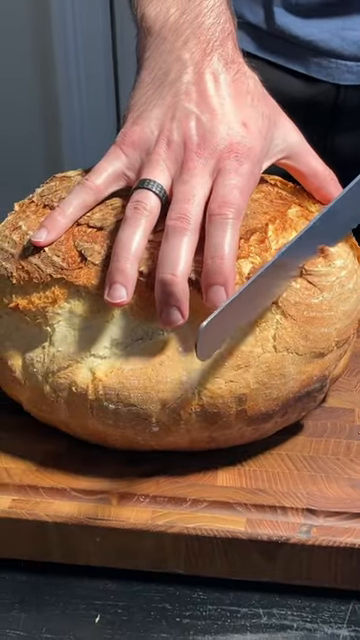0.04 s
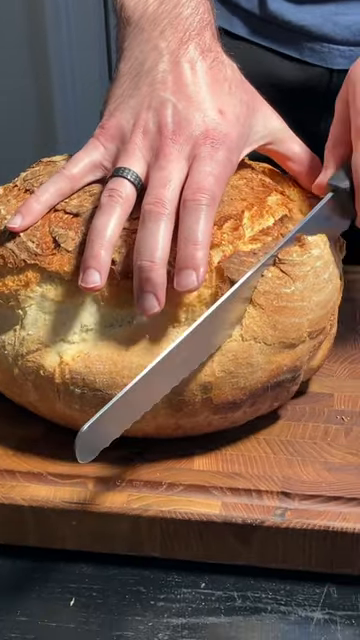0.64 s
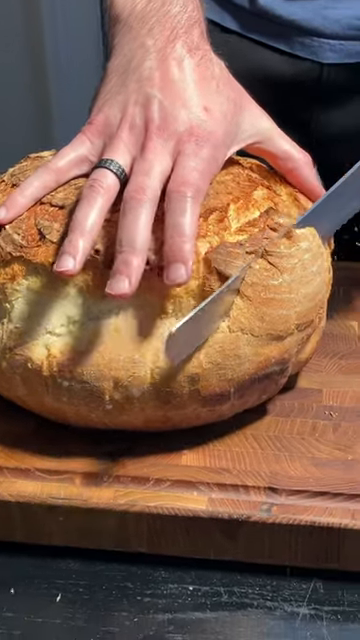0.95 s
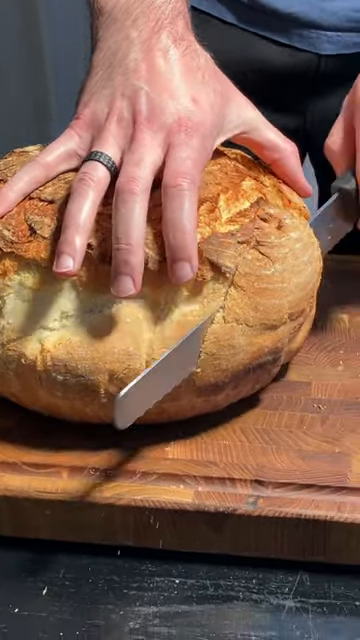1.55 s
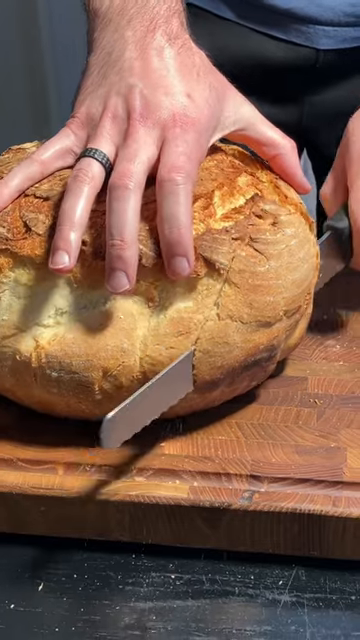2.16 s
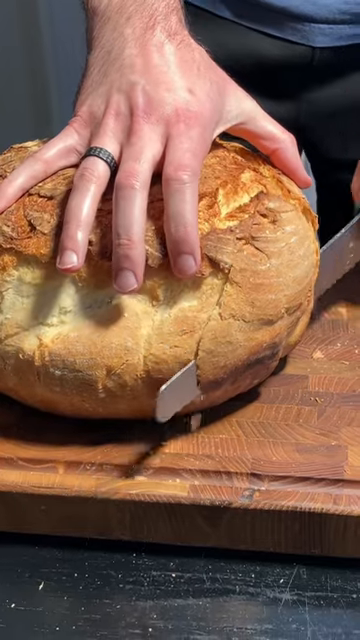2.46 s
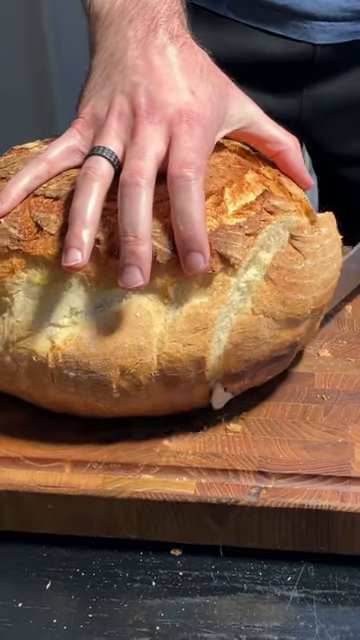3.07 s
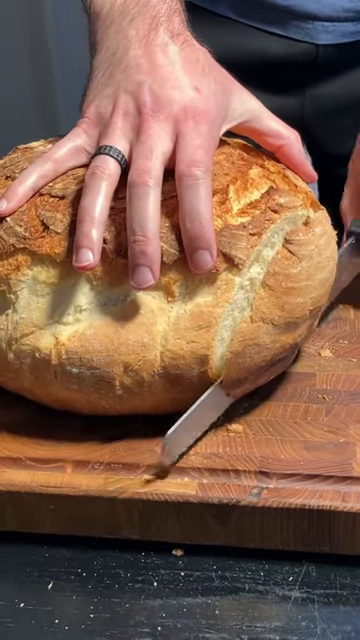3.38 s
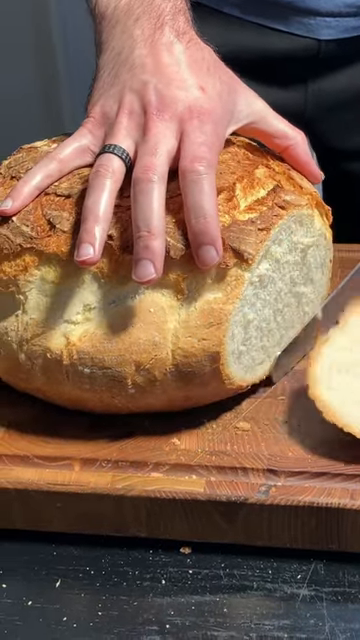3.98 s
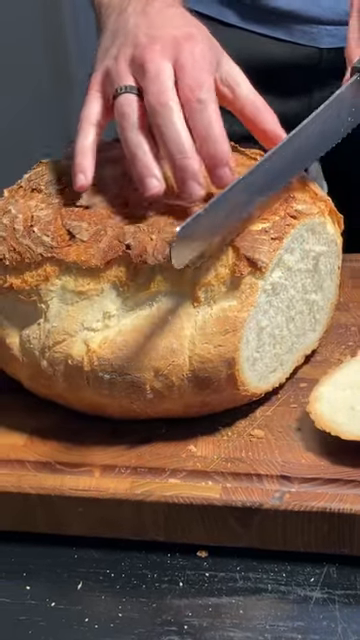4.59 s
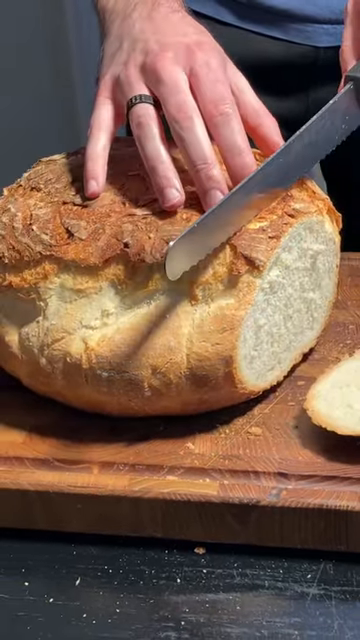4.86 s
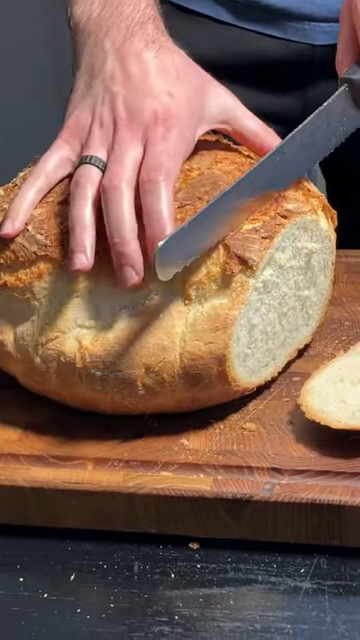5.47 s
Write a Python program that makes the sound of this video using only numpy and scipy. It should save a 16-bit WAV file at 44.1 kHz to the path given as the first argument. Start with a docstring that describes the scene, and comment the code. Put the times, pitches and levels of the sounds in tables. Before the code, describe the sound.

From the start, a serrated knife saws through a crusty loaf, close to the microphone in an echoing kitchen with a faint, steady low hum. Uneven pushes and pulls come about three or four times a second. Each brings bright crackles and snaps of crust, a dry rasp with a slight steel ring, and dull thumps through the wooden board. At about 3.8 seconds the blade breaks through with a crunch and hits the wood in a sharp clack, the loudest moment, then settles with a few small taps. From 4 seconds it is much quieter: crumbs tick, and the blade gives the loaf a soft, hollow bump near 4.3 seconds. Fingers brush the crust very faintly from 4.6 to 5 seconds, followed by a few crisp ticks. Near 5.4 seconds the blade touches the loaf and the next cut begins, crackling until about 5.7 seconds.

```python
"""Over a low, steady hum, a bread knife saws through a crusty loaf, close by in an echoing kitchen.
Stroke after stroke, its teeth crack the crust, rasp inside the loaf and shake the wooden board.
Near 3.8 s the blade breaks through and knocks on the wood. Crumbs tick and the blade bumps the loaf.
Then fingers brush the crust and take a new grip, and near 5.4 s the next cut begins."""
import sys
import numpy as np
from scipy import signal
from scipy.fft import rfft, irfft, next_fast_len
from scipy.io import wavfile
from scipy.ndimage import uniform_filter1d, map_coordinates

SR = 44100
rng = np.random.default_rng(int(sys.argv[2]) if len(sys.argv) > 2 else 0)


def int16_out(signal):
    """Quantize to a 16-bit WAV file."""
    q = np.round(np.clip(np.atleast_2d(signal).T, -1, 1) * 32767)
    wavfile.write(sys.argv[1], SR, q.astype(np.int16))


N = 252693
TIME = np.arange(N) / SR
TOP_HZ = 16000


def amp(db):
    """Turn decibels into a number to multiply by."""
    return 10 ** (np.asarray(db) / 20)

def unit(x):
    """Scale a signal to an average power of 1."""
    return x / np.sqrt(np.mean(x ** 2) + 1e-20)

def along(points, hz):
    """Read between the rows of a (frequency, value) table, on a log scale."""
    f, v = np.transpose(points)
    return np.interp(np.log(hz + 1), np.log(f + 1), v)

def tone(points):
    """Turn a (frequency, level) table into a gain curve."""
    return lambda hz: amp(along(points, hz))

def resonances(rows):
    """A gain curve with one peak for each (pitch, width, level) row."""
    return lambda f: sum(amp(db) / (1 + (2 * (f - hz) / width) ** 2) for hz, width, db in rows)

def add(track, s, sound):
    """Mix a sound into a track, starting at s seconds."""
    part = track[..., max(round(s * SR), 0):][..., :sound.shape[-1]]
    part += sound[..., :part.shape[-1]]

def filtered(x, response):
    """Multiply each frequency in x by response(frequency)."""
    m = next_fast_len(N + SR // 2)
    return irfft(rfft(x, m) * response(np.fft.rfftfreq(m, 1 / SR)), m)[..., :N]

def coloured(x, gain, size=16384):
    """Shape x with a gain curve that rings only after each hit; white noise keeps its power."""
    cepstrum = irfft(np.log(np.maximum(gain(np.fft.rfftfreq(size, 1 / SR)), 1e-6)))
    cepstrum[1:size // 2] *= 2
    cepstrum[size // 2 + 1:] = 0
    ring = irfft(np.exp(rfft(cepstrum)))
    return signal.fftconvolve(x, ring[None] / np.linalg.norm(ring), axes=1)[:, :N]

def burst(rise, t60):
    """Loudness of one hit, peaking at 1. The fade time t60 is the seconds it takes to drop 60 dB."""
    t = np.arange(SR // 8) / SR
    shape = (1 - np.exp(-t / rise)) * amp(-60 * t / t60)
    return shape / shape.max()

def splinters(rate, scatter_db):
    """Two streams of tiny, uneven cracks, about `rate` a second in each."""
    present = rng.random((2, N)) < rate / SR
    sign = rng.choice([-1, 1], (2, N))
    return unit(present * sign * amp(scatter_db * rng.standard_normal((2, N))))

# How loud the hum is: (time [s], level [dB])
HUM_LEVELS = [(0.0, -51), (0.41, -49), (1.23, -56), (2.47, -49.5), (2.52, -44), (2.71, -49.5), (3.3, -50.5),
              (3.38, -59), (3.57, -53.5), (3.62, -63.5), (4.18, -46), (4.28, -52), (5.33, -51), (5.38, -61),
              (5.46, -49.5), (5.73, -52)]
# The faint rush of room air: (frequency [Hz], level [dB])
AIR_TONE = [(25, -38), (50, -20), (75, -18.5), (100, -26.5), (190, -31.5), (320, -42), (620, -46),
            (1000, -57), (1700, -61.5), (5000, -62), (16000, -74)]
def hum_and_air(hum_hz=63.0, waver_radians=0.2, flutter_db=0.16):
    """A slightly unsteady low hum, like a fridge, in faint room air."""
    drift, flutter = [map_coordinates(knots, [TIME * 5]) for knots in rng.standard_normal((2, 64))]
    level = amp(np.interp(TIME, *np.transpose(HUM_LEVELS)) - flutter_db * flutter)
    hum = level * np.sqrt(2) * np.sin(2 * np.pi * hum_hz * TIME + waver_radians * drift)
    air = coloured(rng.standard_normal((2, N)), tone(AIR_TONE))
    return hum + amp(-60) * spread(air)

def movements(rows):
    """Crackle and push swell to each move's hardest moment; the soft loaf's push fades more slowly."""
    crackle, push = np.zeros((2, N))
    for start, hardest, end, crackle_db, push_db, *_ in rows:
        slack = np.interp(TIME, [start, hardest, end], [1, 0, 1]) ** 2
        before, after = np.maximum(start - TIME, 0), np.maximum(TIME - end, 0)
        crackle_fade = np.exp(-before / 0.02 - after / 0.0053)
        push_fade = np.exp(-before / 0.023 - after / 0.03)
        crackle = np.maximum(crackle, amp(crackle_db - 6 * slack) * crackle_fade)
        push = np.maximum(push, amp(push_db - 7 * slack) * push_fade)
    return np.array([crackle, push])

# Pushes and pulls of the knife:
# (start [s], hardest moment [s], end [s], crackle [dB], push [dB], loaf ring against the rasp [dB])
KNIFE_STROKES = [(-0.1, -0.01, 0.041, -45.5, -37, 1), (0.086, 0.127, 0.3, -42.5, -64, -12.5),
                 (0.162, 0.22, 0.25, -38.5, -32.5, -0.5), (0.318, 0.606, 0.625, -40.5, -38, -2),
                 (0.786, 0.907, 1.042, -44, -43.5, -3), (1.12, 1.317, 1.43, -38.5, -34, -2.5),
                 (1.537, 1.681, 1.715, -48.5, -44, -2), (1.819, 2.013, 2.07, -47, -36.5, -3.5),
                 (2.195, 2.277, 2.32, -41.5, -41.5, 0), (2.4, 2.56, 2.657, -39, -36.5, -5),
                 (2.82, 2.995, 3.062, -37.5, -40.5, -2), (3.195, 3.234, 3.28, -49.5, -44.5, 1.5),
                 (3.306, 3.376, 3.507, -42.5, -43, -1), (3.733, 3.769, 3.773, -33.5, -34, -7)]
def sawing(turn_crackle_db=-64, turn_push_db=-69.5):
    """How much the strokes crackle, push and let the loaf ring; the blade rubs faintly as it turns."""
    starts, _, ends, _, _, ring_db = np.transpose(KNIFE_STROKES)
    rubbing = (TIME < ends[-1]) * amp([[turn_crackle_db], [turn_push_db]])
    crackle, push = np.hypot(movements(KNIFE_STROKES), rubbing)
    stroke = np.searchsorted(starts, TIME) - 1
    return crackle, push, uniform_filter1d(amp(ring_db)[stroke], size=1500)

def tooth_catches(rate, unevenness, scatter_db, count=3000):
    """The teeth catch one after another, unevenly in time and force."""
    when = np.cumsum(np.exp(unevenness * rng.standard_normal(count))) * SR / rate
    force = amp(scatter_db * rng.uniform(-0.6, 1, count))
    return np.bincount(when.astype(int), force, N)[:N]

def bites(catches, t60, rub):
    """Each catch dies away over steady rubbing; the stroke keeps its average strength."""
    power = np.abs(signal.fftconvolve(catches ** 2, burst(rise=0.00022, t60=t60) ** 2)[:N])
    power = power / power.mean() + rub
    return np.sqrt(power / uniform_filter1d(power, size=2600))

def flakes(rate, pitch_hz, octaves, cycles, size_db, size=256):
    """Flakes of crust snap off, each with a short ring at its own pitch."""
    when, height, strength, place = rng.random((int(rate * N / SR), 4)).T
    hz = np.minimum(pitch_hz * 2 ** (octaves * (2 * height - 1)), TOP_HZ)
    turns = hz[:, None] * np.arange(size) / SR
    db = -size_db * np.log(1 - strength[:, None])  # many small flakes, few large ones
    pings = amp(db - 60 * turns / cycles) * np.sin(2 * np.pi * turns)
    index = (when * N).astype(int)[:, None] + np.arange(size)
    angle = 2 * np.pi * place[:, None]
    pair = [pings * np.cos(angle), pings * np.sin(angle)]
    return unit(np.array([np.bincount(index.ravel(), part.ravel(), N)[:N] for part in pair]))

# The bright sound of breaking crust: (frequency [Hz], level [dB])
CRUST_TONE = [(200, -43.5), (1000, -15), (2500, -4), (4300, -7.5), (6000, -5), (8500, 3.5), (12000, 1.5),
              (16000, 4)]
def crunch(breaking):
    """The crust splinters and sheds flakes."""
    cracks = coloured(breaking * splinters(rate=6000, scatter_db=6), tone(CRUST_TONE))
    pings = flakes(rate=1500, pitch_hz=6120, octaves=1.11, cycles=16, size_db=2)
    return cracks + amp(-10) * breaking * pings

# The blade scraping inside the loaf: (frequency [Hz], level [dB])
RASP_TONE = [(40, -38), (100, -13.5), (300, -6.5), (480, -4), (700, 2), (850, -4), (1030, 3.5),
             (1220, -6.5), (1400, -2), (2300, -5), (3300, -15.5), (6000, -15), (16000, -40.5)]
# Notes of the loaf on its board: (pitch [Hz], width [Hz], level [dB])
LOAF_NOTES = [(559.5, 56, 2), (639, 75, 0), (963, 85, 1), (1378, 110, -3), (1728, 80, -7.5)]
def loaf_rasp(scrape, freedom):
    """The teeth rasp in the loaf, which rings freely in some strokes and is held quiet in others."""
    rasp = coloured(scrape * splinters(rate=2500, scatter_db=2), tone(RASP_TONE))
    ring = coloured(scrape * freedom * splinters(rate=2500, scatter_db=4.5), resonances(LOAF_NOTES))
    return rasp + ring

# Notes of the blade when halfway in: (pitch [Hz], width [Hz], level [dB])
STEEL_NOTES = [(1776, 230, -4), (2313, 160, -2), (3140, 360, -4.5), (4310, 300, -4.5), (6020, 500, -6.5)]
# How far the blade is pushed through the loaf: (time [s], reach [0 to 1])
BLADE_REACH = [(0.3, 0.39), (0.7, 1), (1.08, 0.11), (1.5, 0.91), (1.8, 0.01), (2.13, 0.69), (2.36, .2),
               (2.72, 1), (3.2, 0.15), (3.65, 0.96)]
def steel_ring(scrape, slide_octaves=0.4):
    """The blade's notes slide down as it is pushed through and up as it is pulled back."""
    reach = np.interp(TIME, *np.transpose(BLADE_REACH))
    speed = 2 ** (slide_octaves * (0.5 - reach))
    position = np.cumsum(speed) % N
    ring = coloured(rng.standard_normal((2, N)), resonances(STEEL_NOTES))
    return scrape * np.array([np.interp(position, np.arange(N), side) for side in ring])

# Jolts passed on to the board: (frequency [Hz], level [dB])
THUMP_TONE = [(40, -39.5), (85, -11), (106, -4), (135, -5.5), (200, 0), (280, 0), (600, -6), (1000, -15.5),
              (3000, -49), (16000, -78.5)]
# Notes of the wooden board: (pitch [Hz], level [dB], fade time [s])
BOARD_NOTES = [(100.1, -17, 0.18), (169.8, -11, 0.08), (298.1, -2, 0.098), (365, -2, 0.057),
               (450, -7.5, 0.051), (624, -0.5, 0.055), (677, 0, 0.068)]
def board_thump(jolt):
    """Jolts shake the board, whose own notes colour the thumping."""
    wood = resonances([(hz, np.log(1000) / np.pi / t60, db - 16) for hz, db, t60 in BOARD_NOTES])
    shaking = jolt * splinters(rate=2000, scatter_db=2)
    return coloured(shaking, lambda hz: tone(THUMP_TONE)(hz) * (1 + wood(hz)))

def fractures(rows, t60, knock_t60, crack_db, knock_db):
    """Loudness over time of single cracks, and of the knocks they give the loaf."""
    crack, knock = np.zeros((2, N))
    for s, db, extra_db in rows:
        add(crack, s, (amp(db + crack_db) * burst(rise=0.001, t60=t60)) ** 2)
        add(knock, s, (amp(db + extra_db + knock_db) * burst(rise=0.0016, t60=knock_t60)) ** 2)
    return np.sqrt([crack, knock])

# The biggest cracks in the crust: (time [s], level [dB], offset for the knock [dB])
CRUST_SNAPS = [(0.062, -33.5, -21.5), (0.156, -30.5, -15), (0.2055, -28.5, -12.5), (0.229, -24.5, -8.5),
               (0.3267, -33, -6), (0.34, -27.5, -13), (0.3531, -25.5, -9), (0.378, -23.5, -17),
               (0.401, -33.5, -15), (0.4329, -30.5, -26), (0.4567, -24, -24), (0.5068, -21.5, -16.5),
               (0.521, -25.5, -15), (0.5477, -31, -22), (0.5748, -21, -13.5), (0.645, -36.5, -25),
               (0.754, -33, -12), (0.7711, -31, -16.5), (0.804, -36, -12.5), (0.861, -37.5, -4.5),
               (0.876, -31, -5.5), (0.905, -35.5, -3), (1.102, -36.5, -16.5), (1.129, -30.5, -8),
               (1.16, -28.5, -8.5), (1.254, -29.5, -6.5), (1.304, -31, -5.5), (1.327, -27.5, -7.5),
               (1.352, -30.5, -2.5), (1.412, -37, -24), (1.578, -29, -10), (1.6005, -34.5, -1.5),
               (1.618, -38.5, -5), (1.651, -41, 0), (1.6776, -32, -8.5), (1.699, -30.5, -5.5),
               (1.72, -32.5, -7), (1.824, -42.5, -1), (1.865, -39.5, -5.5), (1.926, -31, -7),
               (1.9683, -34, -5.5), (1.997, -28.5, -10), (2.0253, -25.5, -10.5), (2.066, -27, -13),
               (2.084, -33.5, -14), (2.14, -36.5, -12), (2.159, -36.5, -10), (2.2167, -31.5, -7),
               (2.23, -34, -12), (2.3017, -26.5, -11.5), (2.378, -41.5, -1), (2.481, -29, -13),
               (2.515, -34, -6), (2.561, -26.5, -6.5), (2.5875, -24.5, -3.5), (2.607, -31, -5),
               (2.627, -24.5, -18.5), (2.646, -31, -12), (2.691, -34, -14), (2.7262, -35, -18),
               (2.8205, -30, -17.5), (2.858, -29.5, -18), (2.9018, -29.5, -10.5), (2.9501, -26, -5.5),
               (3.054, -33, -4.5), (3.1877, -31.5, -21), (3.246, -39.5, -9.5), (3.264, -32.5, -15.5),
               (3.291, -45, -2.5), (3.391, -29.5, -9.5), (3.4176, -25, -14.5), (3.426, -26.5, -11.5),
               (3.495, -32, -11.5), (3.524, -29.5, -13.5), (3.5503, -33, -13.5), (3.571, -38, -16),
               (3.7155, -31.5, -8.5), (3.7638, -20.5, -3), (3.795, -34, -8), (3.8505, -25, -1.5),
               (5.447, -41.5, -19), (5.499, -26.5, -12), (5.5921, -32.5, -18), (5.604, -32, -19),
               (5.718, -35, -9)]
def crust_snaps():
    """Loudness of the cracks and knocks as big pieces of crust give way under the teeth."""
    return fractures(CRUST_SNAPS, t60=0.016, knock_t60=0.026, crack_db=-5, knock_db=0.8)

# The loaf lurching against the board: (time [s], level [dB])
LOAF_LURCHES = [(0.215, -48), (0.255, -41.5), (0.355, -38.5), (0.612, -36.5), (1.335, -32), (1.915, -35.5),
                (2.441, -37.5), (2.495, -40), (2.992, -36.5), (5.391, -50), (5.497, -41.5), (5.598, -47)]
def lurches():
    """Loudness of the soft thuds when the blade sticks and drags the loaf."""
    force = np.zeros(N)
    for s, db in LOAF_LURCHES:
        add(force, s, amp(db) * burst(rise=0.0048, t60=0.06))
    return force

def struck(notes, rise, side_db=-5):
    """One blow rings the notes at slightly random strengths: a middle part and a weaker side part."""
    t = np.arange(SR // 3) / SR
    sound = np.zeros((2, len(t)))
    for hz, db, t60 in notes:
        phase = 2 * np.pi * rng.random((2, 1))
        sound += amp(db + rng.normal(0, 1) - 60 * t / t60) * np.sin(2 * np.pi * hz * t + phase)
    return sound * amp([[0], [side_db]]) * (1 - np.exp(-t / rise)) / 2

# The blade landing and settling, then soft pats as the cut slice is laid on the board: (time [s], blade level
# [dB], wood level [dB])
BOARD_KNOCKS = [(3.768, -13.5, -21.5), (3.7735, -27, -15), (3.781, -32, -21), (3.793, -25, -30.5),
                (3.807, -27, -25.5), (3.852, -31, -25.5), (3.873, -38.5, -25.5), (3.895, -44, -28.5),
                (4.001, -32.5, -39.5), (4.065, -41, -46), (4.137, -40.5, -46.5)]
# Notes of the struck blade: (pitch [Hz], level [dB], fade time [s])
BLADE_NOTES = [(980, -6, 0.032), (1112, -3, 0.055), (1399, -7.5, 0.037), (1813, 1.5, 0.055),
               (2210, -2, 0.027), (2325, -2, 0.029), (3410, -11, 0.028)]
def blade_on_board(dulling=0.8):
    """The blade breaks through and hits the wood, crushing the bottom crust. Softer blows ring duller."""
    ring, crush, clack = np.zeros((2, N)), np.zeros(N), np.zeros(N)
    for s, blade_db, wood_db in BOARD_KNOCKS:
        db_per_octave = dulling * (blade_db - BOARD_KNOCKS[0][1])
        notes = [(hz, db + db_per_octave * np.log2(hz / BLADE_NOTES[0][0]), t60)
                 for hz, db, t60 in BLADE_NOTES]
        add(ring, s, amp(blade_db) * struck(notes, rise=0.00021))
        add(ring, s, amp(wood_db + 2.5) * struck(BOARD_NOTES, rise=0.0018))
        add(clack, s, amp(blade_db - 16) * burst(rise=0.00051, t60=0.055))
        add(crush, s, amp(wood_db - 15) * burst(rise=0.0014, t60=0.16))
    # The hard clack and the dull crush: (frequency [Hz], level [dB])
    hard = [(200, -13), (900, -9.5), (1400, -3.5), (2200, 2), (3400, 1.5), (8000, -33), (16000, -35)]
    dull = [(50, -27.5), (140, -2.5), (350, 3), (650, -1), (900, -5), (2200, -11), (3500, -17.5),
            (16000, -33.5)]
    contact = coloured(clack * splinters(rate=7200, scatter_db=1.5), tone(hard))
    crumple = coloured(crush * splinters(rate=5000, scatter_db=0), tone(dull))
    return ring + contact + crumple

# Light ticks after the cut: (time [s], level [dB], offset for the knock [dB])
CRUMB_TICKS = [(4.0167, -31.5, -8), (4.034, -34.5, -8), (4.2391, -47, -4), (4.2725, -38, -3.5),
               (4.3808, -47, -5.5), (4.8504, -50.5, -10), (4.954, -53, -7), (5.0125, -40, -10),
               (5.0306, -36, -13), (5.0644, -28.5, -16), (5.1356, -43.5, -25), (5.2659, -49.5, -14),
               (5.3427, -44, -16)]
def crumb_ticks():
    """Loudness of the ticks and knocks as crumbs, blade and fingers touch the crust."""
    return fractures(CRUMB_TICKS, t60=0.009, knock_t60=0.016, crack_db=-5, knock_db=-2)

# The flat of the blade meeting the loaf: (time [s], level [dB])
LOAF_BUMPS = [(4.2721, -35.5), (5.393, -43)]
# Notes of the bumped loaf: (pitch [Hz], level [dB], fade time [s])
HOLLOW_NOTES = [(404.3, -9, 0.031), (660, 1, 0.026), (890, 1, 0.021), (1250, 3.5, 0.014), (1560, -9, 0.01),
                (1797, -3, 0.02)]
def blade_on_loaf():
    """The blade bumps the loaf with a short, dull, hollow knock."""
    sound = np.zeros((2, N))
    for s, db in LOAF_BUMPS:
        add(sound, s, amp(db) * struck(HOLLOW_NOTES, rise=0.00035))
    return sound

# The soft hiss of skin on crust: (frequency [Hz], level [dB])
SKIN_TONE = [(500, -22.5), (2000, 0.5), (3700, 0.5), (5600, 3.5), (8000, -21.5), (16000, -26)]
def fingers(start_s=4.59, end_s=5.05, level_db=-75):
    """Fingertips brush the floury crust in one soft sweep on their way to the new grip."""
    progress = np.interp(TIME, [start_s, end_s], [0, 1])
    hiss = coloured(rng.standard_normal((2, N)), tone(SKIN_TONE))
    return amp(level_db) * np.sin(np.pi * progress) * hiss

# Small moves on top of the loaf: (start [s], hardest moment [s], end [s], crackle [dB], push [dB])
GRIP_SHIFTS = [(4.9, 5.05, 5.2, -76, -63), (5.012, 5.06, 5.085, -53.5, -59.5),
               (5.27, 5.35, 5.8, -74.5, -68), (5.389, 5.394, 6, -49.5, -53), (5.447, 5.5, 5.515, -43, -45),
               (5.53, 5.72, 5.7, -46.5, -49)]
def gripping():
    """How much the crust crackles and the loaf is pushed as the hand and the resting blade shift."""
    return movements(GRIP_SHIFTS)

def bread():
    """Knife and hand together break the crust, scrape the loaf and jolt the board."""
    saw_crackle, saw_push, freedom = sawing()
    grip_crackle, grip_push = gripping()
    # Rasping needs both hard crust and pressure, and is weaker while the blade only skims the top.
    friction = np.sqrt(saw_crackle * saw_push) + amp(-1) * np.sqrt(grip_crackle * grip_push)
    catches = tooth_catches(rate=190, unevenness=0.65, scatter_db=5.5)
    cracking = amp(-2) * (saw_crackle + grip_crackle) * bites(catches, t60=0.035, rub=0.28)
    grating = amp(-5) * friction * bites(catches, t60=0.025, rub=0.35)
    shoving = amp(-4.5) * (saw_push + grip_push) * bites(catches, t60=0.028, rub=0.76)
    crack, knock = np.hypot(crust_snaps(), crumb_ticks())  # hypot adds two loudness curves by power
    breaking = np.hypot(cracking, crack)
    scrape = np.hypot(grating, amp(-2) * knock)
    jolt = np.hypot(shoving, np.hypot(amp(-11) * knock, lurches()))
    return (crunch(breaking) + loaf_rasp(scrape, freedom)
            + amp(-12) * steel_ring(scrape) + board_thump(jolt))

def reflected(x, response, size=16384):
    """Hands and knife keep moving, so each stretch of sound meets a new set of echoes."""
    wet = np.zeros((2, N))
    for start in range(0, N, size):
        add(wet, start / SR, signal.fftconvolve(x[:, start:start + size], response(), axes=1))
    return wet

def worktop(x, level_db=-4.5, t60=0.061, count=14):
    """The worktop and nearby things throw back quick, weak copies; small surfaces return little bass."""
    def echoes():
        delay = rng.uniform(0.001, 0.016, count)
        strength = rng.choice([-1, 1], count) * amp(-60 * delay / t60)
        copies = np.bincount((delay * SR).astype(int), strength)
        return copies[None] / np.linalg.norm(copies)
    early = amp(level_db) * reflected(x, echoes, size=8192)
    return filtered(early, lambda hz: hz / np.hypot(hz, 1200))

# How long the kitchen rings: (frequency [Hz], fade time [s])
ROOM_FADE = [(100, 0.82), (300, 0.5), (1000, 0.7), (3000, 0.59), (8000, 0.39), (15000, 0.6)]
# How loud its echo is next to the direct sound: (frequency [Hz], level [dB])
ROOM_TONE = [(100, -1.5), (400, -9), (2000, -4.5), (6000, -1.5), (15000, -16)]
def kitchen(x):
    """Hard walls answer with a wash of echoes that lasts longest in the bass."""
    hz, t, noise = signal.stft(rng.standard_normal((2, SR)), SR, nperseg=256)
    fade = amp(-60 * t / along(ROOM_FADE, hz)[:, None]) * (1 - np.exp(-t / 0.00047))

    def tail():
        shifted = np.roll(noise, rng.integers(len(t)), axis=2)
        ring = signal.istft(shifted * fade, SR, nperseg=256)[1]
        return ring / np.linalg.norm(ring[0])
    return filtered(reflected(x, tail), tone(ROOM_TONE))

# How alike left and right are: (frequency [Hz], likeness [0 to 1])
STEREO_LIKENESS = [(150, 0.98), (600, 0.7), (1100, 0.4), (1900, 0.65), (3000, 0.21), (4300, 0.52),
                   (6000, 0.95), (15000, 1)]
# How far left runs ahead of right: (frequency [Hz], lead [radians])
LEFT_LEAD = [(150, 0), (400, -0.37), (800, -1.66), (1030, -0.8), (1250, -0.55), (1750, 0.66), (2300, -0.76),
             (4200, -5), (5700, -3), (8300, 0), (11700, 2), (14200, 6.5), (16000, 9)]
def spread(pair):
    """Share two signals between the left and right microphones, partly alike and out of step."""
    def shares(hz):
        angle = np.arccos(np.clip(along(STEREO_LIKENESS, hz), -1, 1)) / 2
        return np.array([np.cos(angle), np.sin(angle)])
    mid, side = filtered(pair, shares)
    left_right = np.array([mid + side, mid - side])
    return filtered(left_right, lambda hz: np.exp(along(LEFT_LEAD, hz) * np.array([[0.5j], [-0.5j]])))

# How much louder left is than right: (frequency [Hz], level [dB])
LEFT_BOOST = [(60, 3.5), (290, 1.5), (950, -2.5), (1800, -0.5), (2700, -3), (5500, 0)]
def scene():
    """Loaf and board close by, with the kitchen and its hum around them."""
    near = bread() + blade_on_board() + blade_on_loaf() + fingers()
    stereo = spread(near + worktop(near) + kitchen(near)) + hum_and_air()
    return filtered(stereo, lambda hz: amp(along(LEFT_BOOST, hz) * np.array([[0.5], [-0.5]])))

def record(dry):
    """Keep only the sound below TOP_HZ."""
    return filtered(dry, lambda hz: hz < TOP_HZ)


dry = scene()
out = record(dry)
int16_out(out)
```